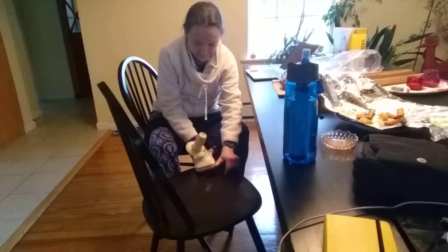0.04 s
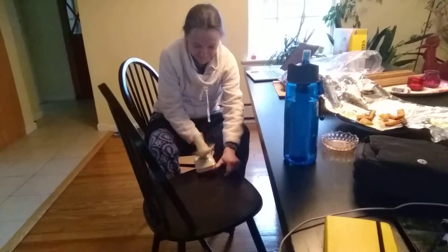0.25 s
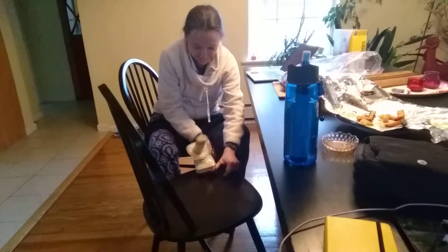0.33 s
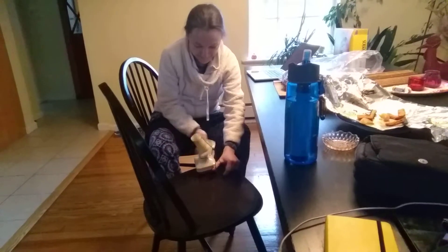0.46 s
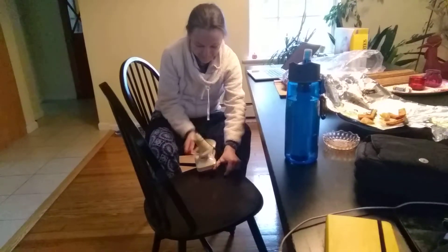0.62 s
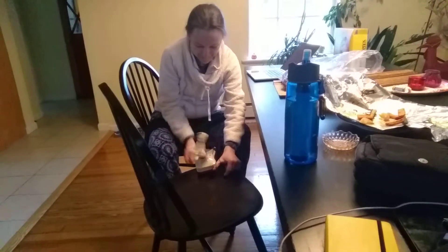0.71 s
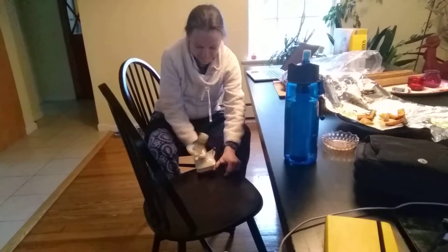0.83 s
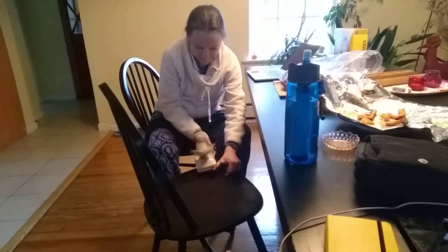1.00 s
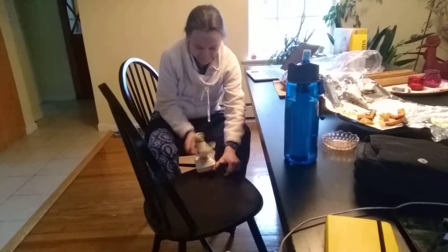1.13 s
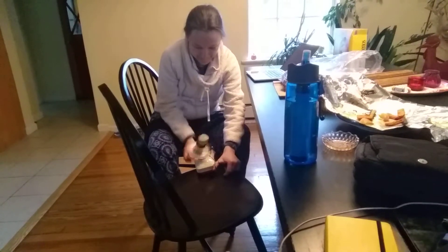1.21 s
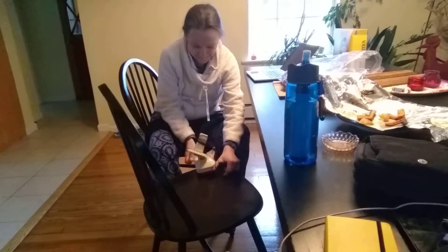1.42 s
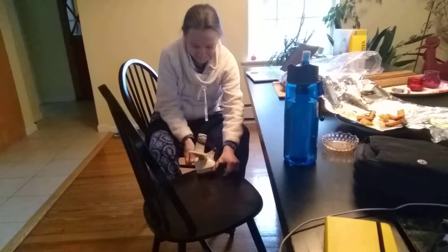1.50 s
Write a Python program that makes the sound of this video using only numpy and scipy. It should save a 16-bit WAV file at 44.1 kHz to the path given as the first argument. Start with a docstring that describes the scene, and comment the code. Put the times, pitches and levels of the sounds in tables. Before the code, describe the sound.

In a quiet room, a small hand-turned wooden winder clatters, its loose gears clicking and its shaft rubbing. A whirr and low hum build, then the turning stops and the wood rings down, a short distance from the microphone.

```python
"""A small wooden yarn spinner is cranked by hand on a chair seat in a quiet room. After a first knock,
from 0.25 s loose gear teeth excite the wooden frame by impact and the seat drones in forced vibration.
The shaft rubs and, from 0.4 s, chirps by stick-slip friction; slack parts knock. From 0.6 s the wheel
whirrs. Near 1.25 s the cranking stops and the wood rings down under two last faint knocks.
A phone with two microphones and a stereo widener hears it all from across the table."""
import sys
import numpy as np
from scipy import signal
from scipy.fft import rfft, irfft
from scipy.io import wavfile

SR = 44100
rng = np.random.default_rng(int(sys.argv[2]) if len(sys.argv) > 2 else 0)


def pcm_store(signal):
    """Save signal as 16-bit PCM."""
    levels = np.round(np.clip(np.atleast_2d(signal), -1, 1) * 32767)
    wavfile.write(sys.argv[1], SR, levels.astype(np.int16).T)


N = 68355
T = np.arange(N) / SR


def undb(db):
    """Amplitude ratio of a level in decibels."""
    return 10 ** (np.asarray(db) / 20)


def unit(x):
    """Normalisation to rms 1."""
    return x / np.sqrt(np.mean(x ** 2))


def unit_energy(x):
    """Energy normalisation: such a response keeps the power of white noise."""
    return x / np.sqrt(np.sum(x ** 2, axis=-1, keepdims=True))


def curve(table, column=1):
    """Linear interpolation of a column over time."""
    rows = np.array(table)
    return np.interp(T, rows[:, 0], rows[:, column])


def gains(table, size):
    """Magnitude response of (Hz, dB) rows, interpolated over log frequency."""
    rows = np.array(table)
    hz = np.fft.rfftfreq(size, 1 / SR)
    return undb(np.interp(np.log(hz + 1), np.log(rows[:, 0]), rows[:, 1]))


def colour(table, size=16384):
    """Minimum-phase impulse response with the given spectral shape."""
    cepstrum = irfft(np.log(gains(table, size)))
    cepstrum[1:size // 2] *= 2
    cepstrum[size // 2 + 1:] = 0
    return unit_energy(irfft(np.exp(rfft(cepstrum))))


def through(x, response):
    """Convolution with an impulse response."""
    return signal.fftconvolve(x, response)[:N]


def butter(x, hz, kind="lowpass", order=2):
    """Maximally flat filtering."""
    return signal.sosfilt(signal.butter(order, hz, kind, fs=SR, output="sos"), x)


def fade(t60, age=T):
    """Exponential decay, 60 dB in t60 seconds."""
    return np.exp(-np.log(1000) * age / t60)


def wobble(hz):
    """Random modulation: low-passed noise, rms 1."""
    return unit(butter(rng.standard_normal(N), hz))


def impacts(per_s, jitter, scatter_db):
    """Impulse train with log-normal gaps and sizes, rms 1."""
    gap, strength, polarity = rng.standard_normal((N // 16, 3)).T
    at = (np.cumsum(np.exp(jitter * gap - jitter ** 2 / 2)) / per_s * SR).astype(int)
    size = undb(scatter_db * np.clip(strength, -2, 2)) * np.sign(polarity)
    return unit(np.bincount(at[at < N], size[at < N], N))


def ringing(modes):
    """Modal superposition: a struck body responds with a sum of damped sinusoids."""
    tones = (undb(db) * unit_energy(fade(t60) * np.sin(2 * np.pi * hz * T)) for hz, t60, db in modes)
    return unit_energy(sum((-1) ** k * tone for k, tone in enumerate(tones)))


# Spectrum of the quiet room. Each row: frequency in Hz, relative level in dB.
AIR_SPECTRUM = [(25, 4), (70, 6.5), (140, 10), (300, 6.5), (700, -0.5), (1500, -10), (2400, -13),
                (4000, -28), (8000, -19), (15500, -20.5)]
def air():
    """Ambient noise: steady, random and strongest in the bass."""
    return through(rng.standard_normal(N), colour(AIR_SPECTRUM))


def reflections(x, early_t60=.032, room_t60=.6, treble_t60=.45, gap_s=.0074, shift_hz=10.6):
    """Reverberation: early echoes off table and chair shift as hand and frame move; a tail follows."""
    diffuse = rng.standard_normal(N)
    low = butter(diffuse, 2500)
    tail = unit_energy((low * fade(room_t60) + (diffuse - low) * fade(treble_t60)) * (T > gap_s))
    paths = unit_energy(butter(rng.standard_normal((5, N)), 890, "highpass") * fade(early_t60))
    shares = unit_energy(np.array([wobble(shift_hz) for _ in paths]).T).T
    early = sum(share * through(x, path) for share, path in zip(shares, paths))
    return undb(-6.5) * early + undb(-7.5) * through(x, tail)


# Thuds on the seat. Each row: start in seconds, frequency in Hz, relative level in dB.
SEAT_THUDS = [(.403, 84.5, -40), (.535, 101, -38), (.59, 94, -41), (.695, 109, -40), (.885, 95.5, -39.5)]
def thuds(rise_s=.01):
    """Soft impact: the frame rocks on the seat, raising low tones that swell and die."""
    out = np.zeros(N)
    for start, hz, db in SEAT_THUDS:
        age = np.maximum(T - start, 0)
        out += undb(db) * age / rise_s * np.exp(1 - age / rise_s) * np.sin(2 * np.pi * hz * age)
    return out


# Drone of the seat. Each row: time in seconds, frequency in Hz, relative level in dB.
SEAT_DRONE = [(.22, 141.6, -59), (.28, 138.6, -46.5), (.40, 131.5, -44), (.47, 123, -53), (.55, 120.4, -49),
              (.64, 120.3, -59), (.74, 117.6, -42), (.84, 122.6, -36), (.92, 123.9, -40), (.97, 126.3, -58),
              (1.035, 135.3, -31.5), (1.13, 132.7, -36.5), (1.23, 127, -33.5), (1.26, 137.4, -51)]
def seat_drone(roughness=.14, flutter_hz=30, release_t60=.72):
    """Forced vibration: the seat hums unsteadily under the shaking frame, then decays."""
    phase = 2 * np.pi * np.cumsum(curve(SEAT_DRONE)) / SR
    release = fade(release_t60, age=np.maximum(T - SEAT_DRONE[-1][0], 0))
    envelope = undb(curve(SEAT_DRONE, column=2)) * release
    return unit(np.sin(phase)) * envelope * (1 + roughness * wobble(flutter_hz))


# Whirr of the wheel. Each row: time in seconds, lower partial in Hz, relative level in dB.
WHEEL_WHIRR = [(.6, 440, -57), (.69, 456, -40), (.76, 432, -42), (.84, 436, -43.5), (.91, 419, -50),
               (1.0, 440.8, -42), (1.08, 440, -50), (1.21, 446, -46), (1.3, 430, -51.5)]
def wheel_whirr(roughness=.45, flutter_hz=35, skirt_t60=.33, fifth_db=-4):
    """Modulation: two partials a fifth apart flutter in level and glide with the speed of the crank."""
    phase = 2 * np.pi * np.cumsum(curve(WHEEL_WHIRR)) / SR
    lower, upper = (np.sin(ratio * phase) * (1 + roughness * wobble(flutter_hz)) for ratio in (1, 1.5))
    outside_s = np.abs(T - np.clip(T, WHEEL_WHIRR[0][0], WHEEL_WHIRR[-1][0]))
    envelope = undb(curve(WHEEL_WHIRR, column=2)) * fade(skirt_t60, age=outside_s)
    return np.sqrt(2) * (lower + undb(fifth_db) * upper) * envelope


# Strength of the rubbing. Each row: time in seconds, relative level in dB.
RUB_LEVEL = [(0, -51.5), (.07, -59), (.22, -58.5), (.27, -50.5), (.32, -54), (.36, -46.5), (.44, -43.5),
             (.52, -55), (.59, -54.5), (.635, -59.5), (.74, -48.5), (.79, -53.5), (.83, -48), (.92, -51.5),
             (.96, -46), (1.09, -42.5), (1.17, -50), (1.24, -55), (1.3, -61.5)]
# Spectrum of the rubbing. Each row: frequency in Hz, relative level in dB.
RUB_SPECTRUM = [(500, -36), (2000, 0.5), (2800, -4.5), (3700, -0.5), (4700, 0.5), (5600, -5), (6500, -12),
                (8000, -13.5), (11500, -22.5), (15500, -19.5)]
def shaft_rub():
    """Sliding friction: dense tiny slips of the shaft merge into gritty noise."""
    slips = impacts(per_s=1100, jitter=.9, scatter_db=1.5)
    return through(slips * undb(curve(RUB_LEVEL)), colour(RUB_SPECTRUM))


# Chirps of the shaft. Each row: start in seconds, frequency in Hz, relative level in dB.
SHAFT_CHIRPS = [(.3935, 5650, -37), (.4007, 3560, -31), (.7285, 3420, -35), (.7348, 3630, -39.5),
                (1.023, 3600, -35), (1.158, 5673, -43)]
def shaft_chirps(slip_s=.003):
    """Stick-slip friction: the dry shaft catches and lets go in short, shrill tone bursts."""
    out = np.zeros(N)
    for start, hz, db in SHAFT_CHIRPS:
        age = np.clip(T - start, 0, slip_s)
        out += undb(db) * np.sin(np.pi * age / slip_s) ** 2 * np.sin(2 * np.pi * hz * age)
    return out


# Knocks. Each row: start in seconds, relative levels of body and tick in dB, clack pitch in Hz.
KNOCK_EVENTS = [(.0995, -37.5, -47, 1330), (.2385, -37, -60, 1200), (.353, -37, -54, 1500),
                (.358, -31, -43, 1520), (.365, -37, -46, 1250), (.429, -35, -47, 1300),
                (.479, -34.5, -52, 1400), (.5761, -36, -62, 1450), (.6923, -38, -64, 1300),
                (.7138, -36, -64, 1200), (.872, -43, -54, 1400), (.9328, -29, -60, 1380),
                (.955, -38, -51, 1500), (1.033, -33.5, -50, 1550), (1.074, -34, -48, 1450),
                (1.081, -27, -42, 1600), (1.089, -35, -43, 1500), (1.131, -35, -56, 1300),
                (1.147, -36, -56, 1400), (1.159, -34, -48, 1450), (1.183, -42, -52, 1400),
                (1.481, -55, -65, 1450), (1.511, -53, -70, 1400)]
# Modes of the slack parts. Each row: ratio to the pitch, 60 dB decay in seconds, relative level in dB.
CLACK_MODES = [(.75, .018, -5), (.9, .022, -2), (1, .026, 0), (1.13, .018, -3)]
# Spectra of the wooden body and the tick. Each row: frequency in Hz, relative level in dB.
BODY_SPECTRUM = [(60, -22), (300, 10.5), (750, 2.5), (1100, 5), (1650, -7.5), (2100, -1.5), (3000, -8.5),
                 (15000, -56)]
TICK_SPECTRUM = [(500, -7), (2500, -7), (4000, 9), (5600, 1), (7000, 7), (8000, 3), (11500, 0),
                 (15500, -17)]
def knocks(blow_db=21, tick_t60=.032, body_t60=.016):
    """Impact excitation: a slack part gives a crunchy tick and a hollow ring, pitched by where it lands."""
    rows = np.array(KNOCK_EVENTS)
    starts = (rows[:, 0] * SR).astype(int)
    body_blows, tick_blows = (np.bincount(starts, undb(rows[:, k] + blow_db), N) for k in (1, 2))
    tick = rng.standard_normal(N) * through(tick_blows, unit_energy(fade(tick_t60)))
    body = rng.standard_normal(N) * through(body_blows, unit_energy(fade(body_t60)))
    clacks = np.zeros(N)
    for start, hz in zip(starts, rows[:, 3]):
        modes = [(ratio * hz, t60, db) for ratio, t60, db in CLACK_MODES]
        clacks[start:] += body_blows[start] * ringing(modes)[:N - start]
    return clacks + undb(-1.5) * through(body, colour(BODY_SPECTRUM)) + through(tick, colour(TICK_SPECTRUM))


# Modes of frame and seat. Each row: frequency in Hz, 60 dB decay in seconds, relative level in dB.
FRAME_MODES = [(176.2, 0.18, 2), (195.8, 0.5, 0), (218, 0.3, 2), (236.5, 0.89, -2.5), (300.1, 0.27, -1),
               (322, 0.34, 1.5), (387.4, 0.98, -11), (435.4, 0.75, -7.5), (468.4, 0.33, -5.5),
               (520, 0.63, -20), (624.3, 0.075, -6), (663.6, 0.27, 1), (944, 0.027, -5), (1046, 0.044, -11),
               (1222, 0.26, -13), (1410, 0.09, -23), (1418, 0.046, -9), (1606, 0.054, -2)]
def frame_ring(force, waver_s=.00016, waver_hz=10):
    """Resonance: frame and seat ring at their natural frequencies, wavering under the hand."""
    ring = through(force, ringing(FRAME_MODES))
    return np.interp(T + waver_s * wobble(waver_hz), T, ring)


# Cranking effort. Each row: time in seconds, relative level of the tooth force in dB.
CRANK_EFFORT = [(0, -39), (.04, -50), (.08, -59.5), (.18, -53), (.225, -45.5), (.26, -36.5), (.36, -34.5),
                (.47, -34.5), (.54, -37), (.64, -36), (.71, -37), (.81, -31), (.9, -37), (.96, -31),
                (1.11, -31.5), (1.19, -34), (1.245, -43.5), (1.29, -84), (1.42, -69), (1.55, -60)]
# Spectrum of the clatter in the wood. Each row: frequency in Hz, relative level in dB.
CLATTER_SPECTRUM = [(40, -44.5), (62, -5), (100, 3.5), (190, 3.5), (330, 5.5), (550, 0), (780, -3.5),
                    (1000, -5), (1600, -10), (1900, -13.5), (2400, -15.5), (5000, -25.5), (15000, -81.5)]
def gears():
    """Backlash: loose teeth strike and bounce, giving a dry clatter and driving the frame's modes."""
    strikes = impacts(per_s=110, jitter=.22, scatter_db=2.5)
    bounces = impacts(per_s=700, jitter=.8, scatter_db=2.5)
    force = unit(strikes + undb(-1) * bounces) * undb(curve(CRANK_EFFORT))
    return through(force, colour(CLATTER_SPECTRUM)), undb(-2) * frame_ring(force)


# Diffuse sound, microphone difference against sum. Each row: frequency in Hz, gain in dB.
SIDE_GAIN = [(60, 7), (130, -3), (300, 1.5), (700, -6), (1300, 4.5), (2200, 2.5), (5000, 3.5), (15000, 1.5)]
def scene(wood_side_db=-9.5):
    """Superposition of direct and diffuse sound at two microphones; the wood arrives out of phase."""
    clatter, ring = gears()
    rattle, blows, chirps = clatter + shaft_rub(), knocks(), shaft_chirps()
    wood = ring + wheel_whirr() + undb(-1) * (seat_drone() + thuds())
    direct = undb(-5) * rattle + undb(-1.5) * blows + chirps + wood
    into_room = undb(-1.5) * rattle + undb(-3) * blows + undb(-5) * chirps
    diffuse_mid, diffuse_side = (reflections(into_room) + undb(-55) * air() for _ in range(2))
    mid = direct + diffuse_mid
    quadrature = -1j * undb(wood_side_db) * rfft(wood, 2 * N)  # a quarter cycle behind
    side = irfft(rfft(diffuse_side, 2 * N) * gains(SIDE_GAIN, 2 * N) + quadrature)[:N]
    return np.array([mid + side, mid - side])


# Channel balance. Each row: frequency in Hz, left minus right level in dB.
CHANNEL_BALANCE = [(100, 0.5), (300, -0.5), (450, -1.5), (800, 0), (1300, 0), (1750, 1), (2200, 0.5),
                   (2700, -4.5), (4000, -2.5), (9000, -3), (13000, -4)]
def record(dry, lag_s=.000426, from_hz=750, to_hz=14500):
    """Widening by crosstalk cancellation: above the bass, each channel loses a delayed copy of the other."""
    hz, channels = np.fft.rfftfreq(2 * N, 1 / SR), rfft(dry, 2 * N)
    share = .95 * (1 - np.exp(-(hz / from_hz) ** 2)) * np.exp(-(hz / to_hz) ** 2)
    opposite = np.exp(-2j * np.pi * hz * lag_s) * channels[::-1]
    wide = (channels - share * opposite) / np.sqrt(1 + share ** 2)
    lean = np.sqrt(gains(CHANNEL_BALANCE, 2 * N))
    out = irfft(wide * np.array([lean, 1 / lean]))[:, :N]
    out = butter(out, 87, "highpass", order=3)  # rumble cut
    return signal.sosfilt(signal.ellip(10, .2, 80, 15850, fs=SR, output="sos"), out)  # steep top cut


dry = scene()
out = record(dry)
pcm_store(out)
```